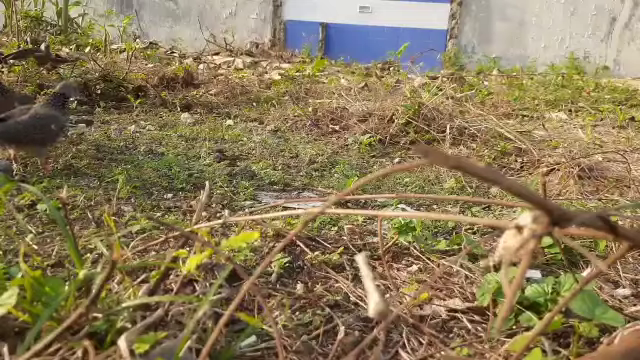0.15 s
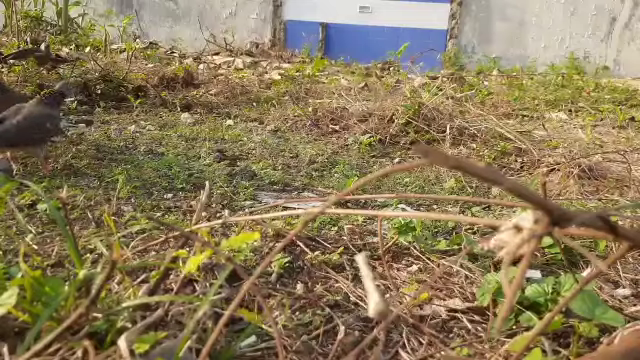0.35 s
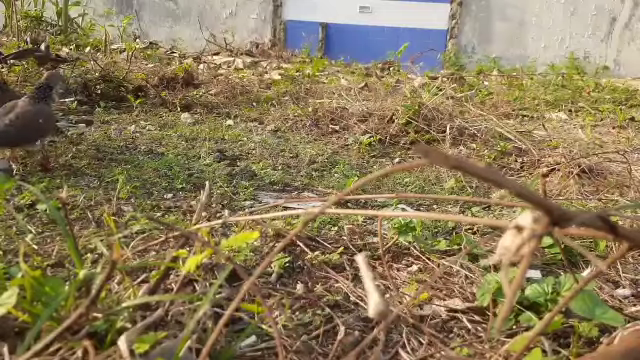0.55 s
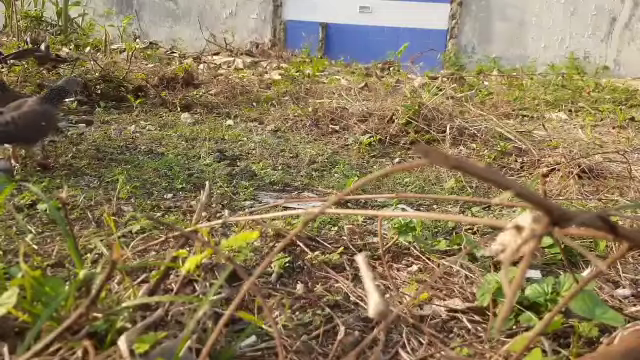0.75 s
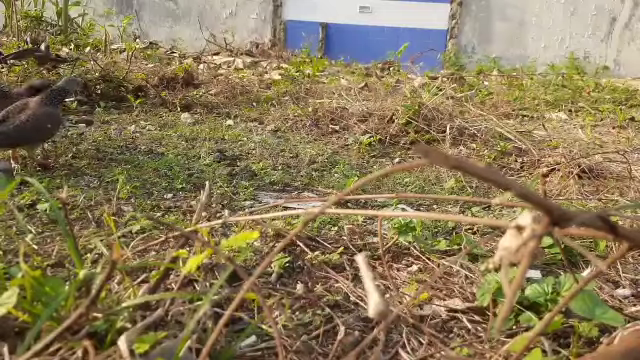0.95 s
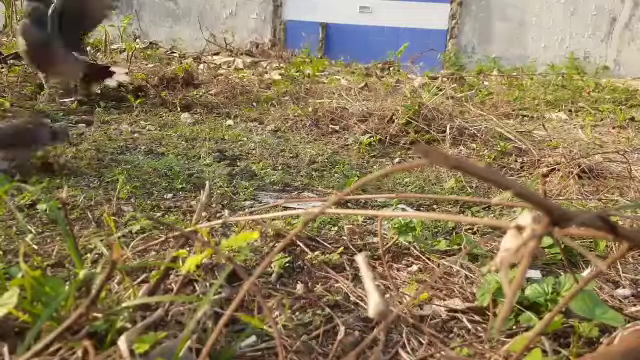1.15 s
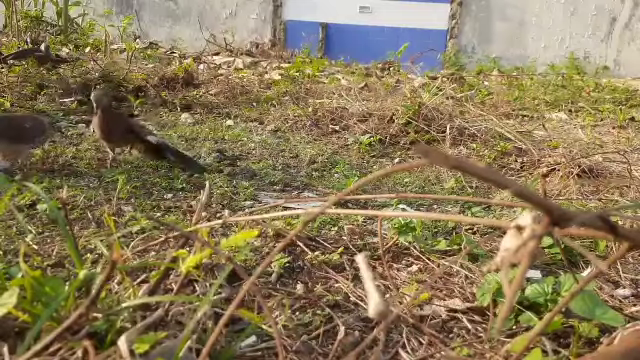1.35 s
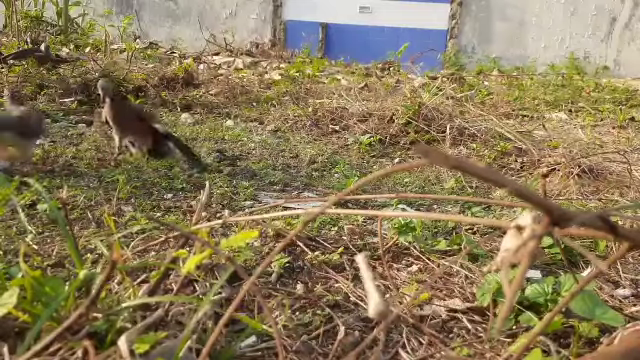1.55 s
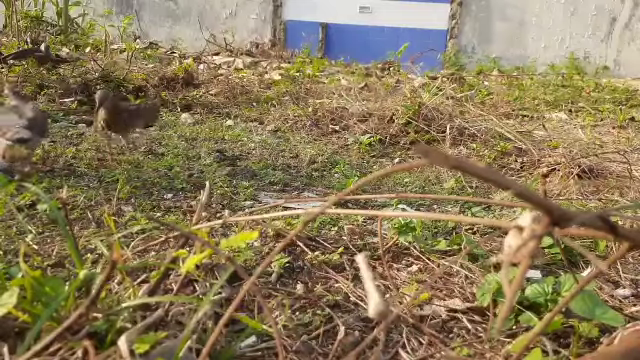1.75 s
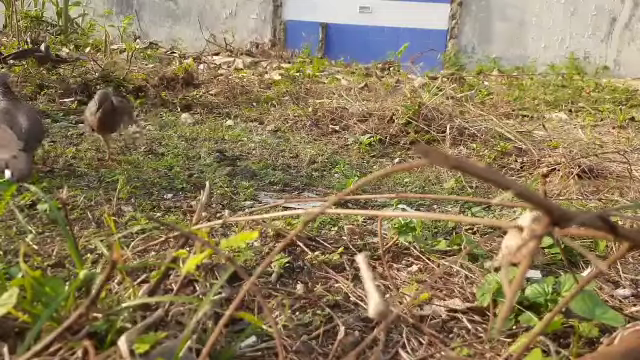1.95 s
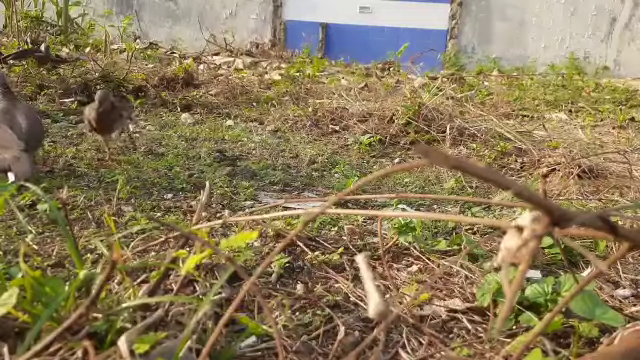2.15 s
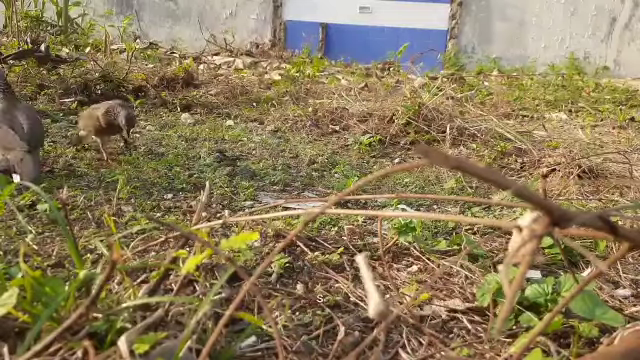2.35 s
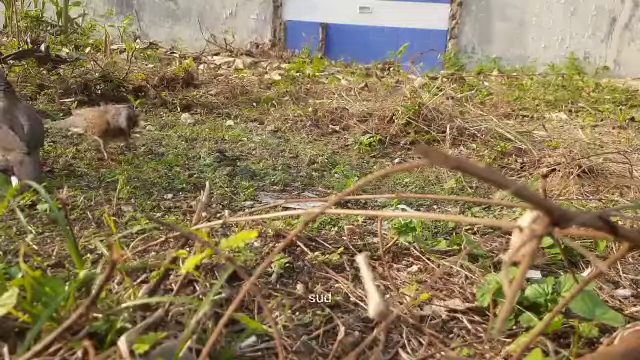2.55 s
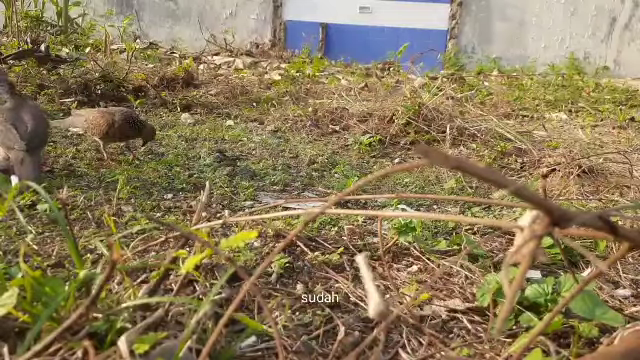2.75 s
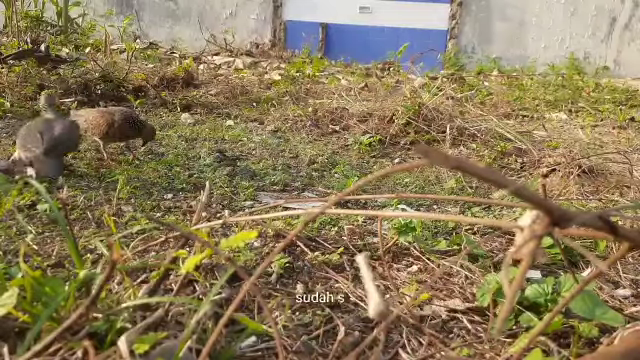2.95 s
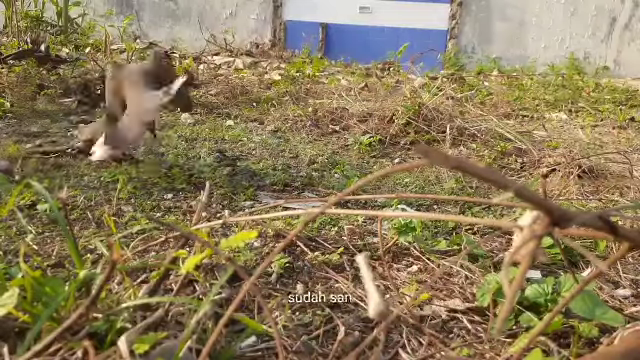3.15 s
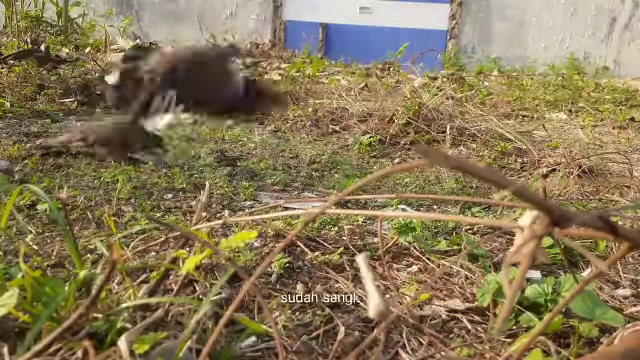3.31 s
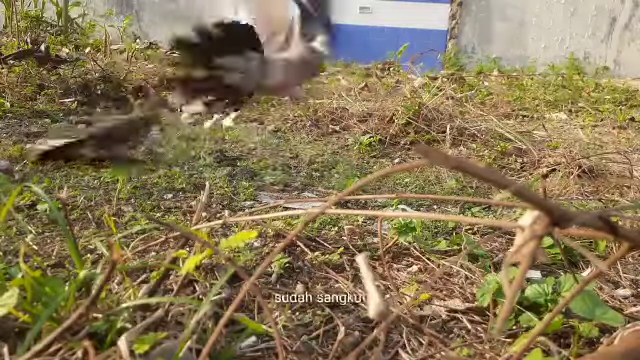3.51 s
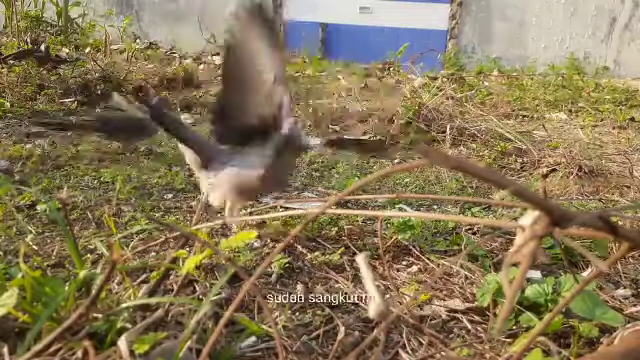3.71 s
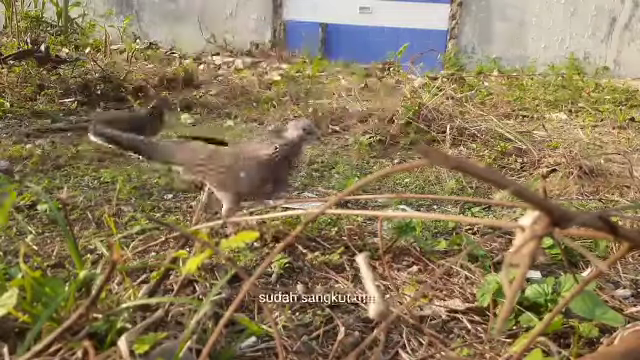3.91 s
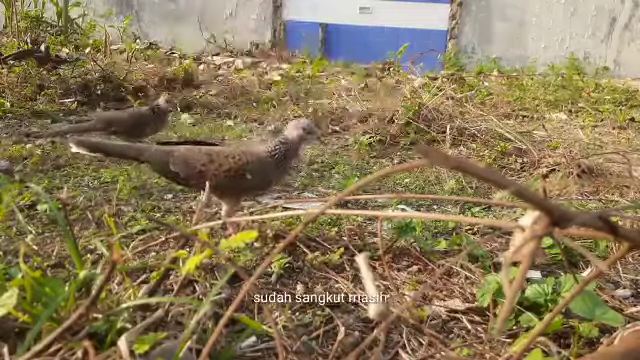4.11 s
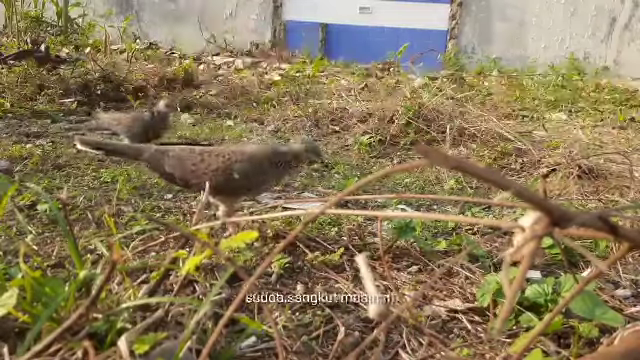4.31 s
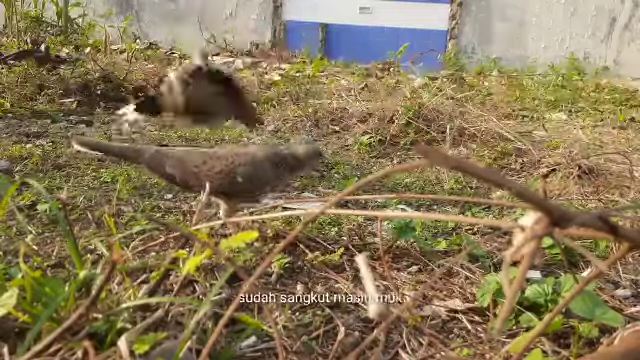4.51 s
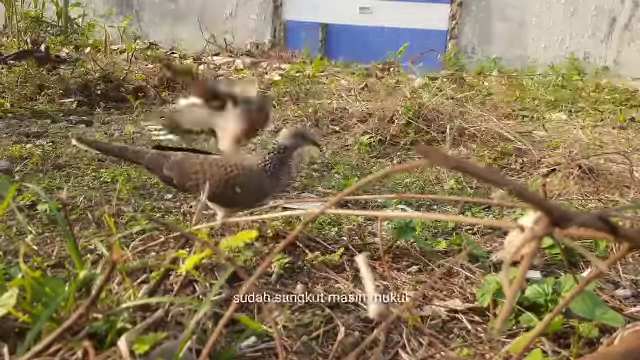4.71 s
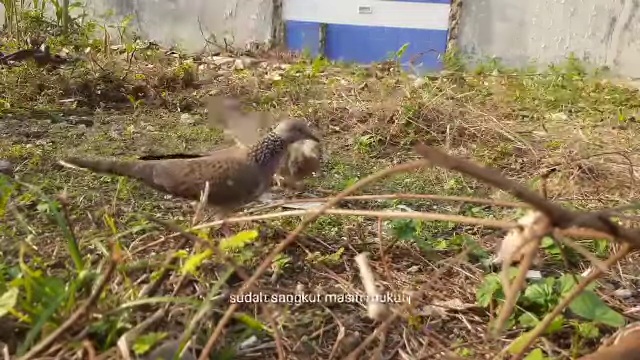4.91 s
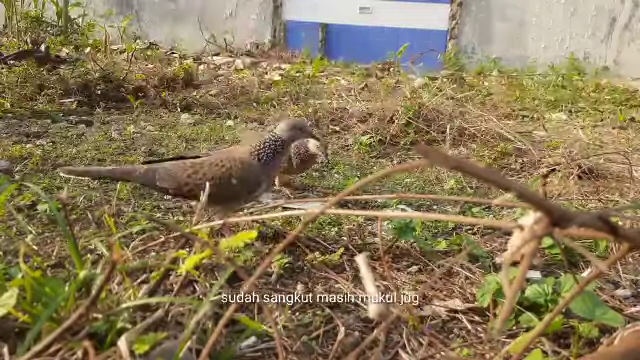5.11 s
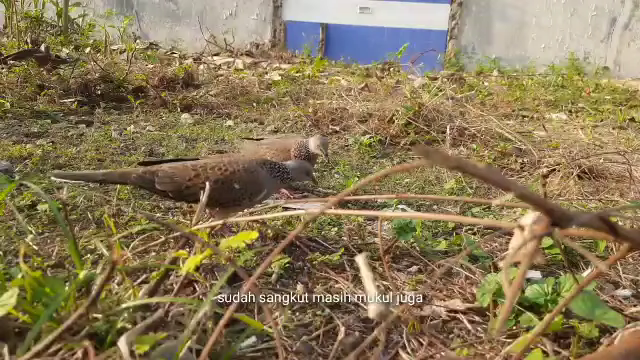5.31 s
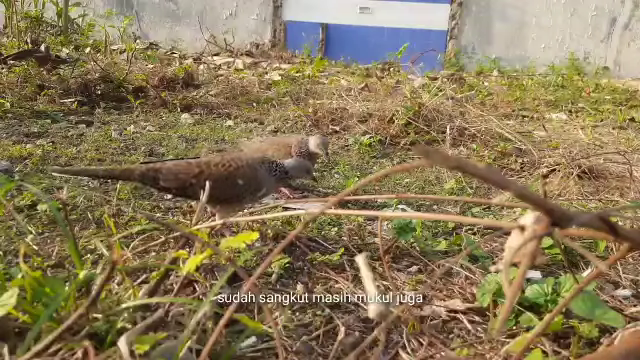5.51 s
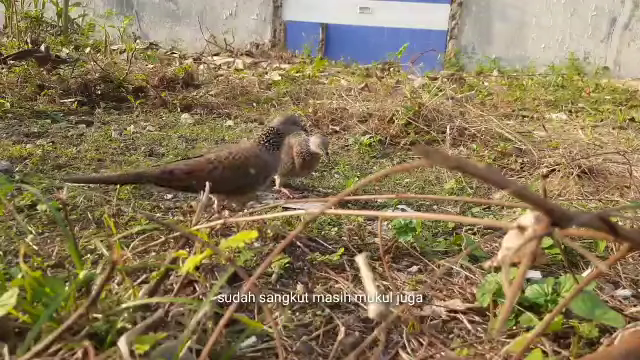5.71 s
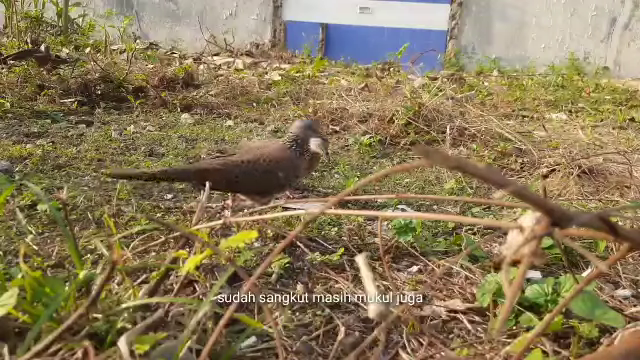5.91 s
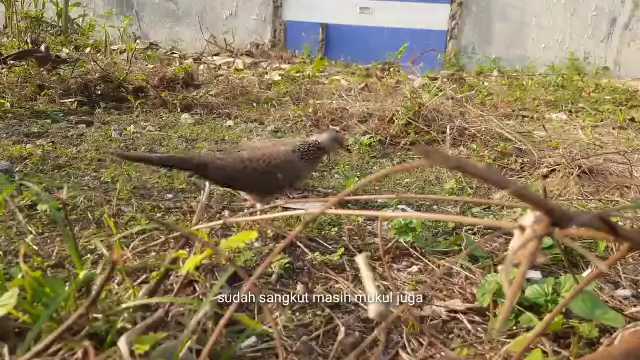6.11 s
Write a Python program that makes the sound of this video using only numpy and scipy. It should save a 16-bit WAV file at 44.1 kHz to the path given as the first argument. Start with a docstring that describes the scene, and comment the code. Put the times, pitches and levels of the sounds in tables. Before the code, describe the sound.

A quiet yard: uneven wind rumble, distant hum, dry stalks crackling under birds' feet on the left. About a second in, nearby wings slap in a very brief flurry. After a pause with little snaps and faint distant whistles, wings clap again, first a quick thump, then a stronger run of whooshing, cracking beats buffeting the microphones. Only small rustles, one faint late flutter and wind remain, with a short, soft outdoor echo.

```python
"""A dove flapping on dry, weedy ground

Near a pair of microphones a dove flaps in short bursts: shaped noise bursts make its feathers crack, short
swings of pressure are the air its wings shove, and swelling noise is the air they tear. Dry stalks rustle
as birds walk: ticking noise. Bright snaps, mostly to the left, are bursts too: stalks under a foot, and one
nearly central snap from the flapping bird. Behind lie rumbling wind and a far hum, both filtered noise, and
far small birds whistle with gliding sines. The yard answers softly."""
import sys
import numpy as np
from scipy import signal
from scipy.fft import rfft, irfft, next_fast_len
from scipy.io import wavfile
from scipy.ndimage import uniform_filter1d, map_coordinates

SR = 44100
rng = np.random.default_rng(int(sys.argv[2]) if len(sys.argv) > 2 else 0)


def wav_out(sig):
    """Save sig, one row per channel (or a flat mono array), as 16-bit PCM at SR to the path in sys.argv[1]."""
    wavfile.write(sys.argv[1], SR, np.round(np.clip(np.atleast_2d(sig).T, -1, 1) * 32767).astype(np.int16))


def attenuation_scalar(level_db):
    """Turn a level in dB into a linear amplitude multiplier (20 dB per decade)."""
    decades = np.asarray(level_db, float) / 20
    return 10 ** decades


N = 271773  # length in samples


def unit(x):
    """Scaled to rms 1."""
    return x / np.sqrt(np.mean(x ** 2) + 1e-20)


def along(points, hz):
    """(Hz, value) points read on a log frequency axis."""
    f, v = np.transpose(points)
    return np.interp(np.log(hz + 1), np.log(f + 1), v)


def curves(rows):
    """One value per sample for each column after the time."""
    s, *columns = np.transpose(rows)
    return [np.interp(np.arange(N) / SR, s, column) for column in columns]


def wobble(rate):
    """A smooth random curve, rate knots a second."""
    knots = rng.standard_normal(int(N * rate / SR) + 4)
    return map_coordinates(knots, [np.arange(N) * rate / SR])


def filtered(x, response):
    """x with its spectrum multiplied by a response of frequency."""
    n = x.shape[-1]
    m = next_fast_len(n + 4096)
    return irfft(rfft(x, m) * response(np.fft.rfftfreq(m, 1 / SR)), m)[..., :n]


def rush(spectrum, alike, source=None):
    """Stereo noise of rms 1, coloured, with the given likeness of the channels."""
    pair = rng.standard_normal((2, N)) if source is None else source

    def mid_side(hz):
        angle = np.arccos(np.clip(along(alike, hz), -1, 1)) / 2
        return attenuation_scalar(along(spectrum, hz)) * [np.cos(angle), np.sin(angle)]

    mid, side = filtered(pair, mid_side)
    return unit(np.array([mid + side, mid - side]))


def patchy(bins, frames, depth_db):
    """Two noises whose gain drifts in shared patches of time and frequency."""
    z = signal.stft(rng.standard_normal((2, N)), nperseg=512)[2]
    field = uniform_filter1d(rng.standard_normal(z.shape[1:]), bins, 0)
    field = uniform_filter1d(field, frames, 1)
    return signal.istft(z * attenuation_scalar(depth_db * unit(field)), nperseg=512)[1][:, :N]


def swells(s, db, rise, fall, hold=0):
    """Gain of overlapping swells: up at rise dB a second, held, down at fall; their powers add."""
    def column(v):
        return np.reshape(v, (-1, 1))

    t = np.arange(0, N + 64, 64) / SR  # one point every 64 samples
    late = t - column(s)
    rising = rise * np.minimum(late, 0)
    falling = column(fall) * np.maximum(late - column(hold), 0)
    power = np.sum(attenuation_scalar(column(db) + rising - falling) ** 2, axis=0)
    return np.interp(np.arange(N) / SR, t, np.sqrt(power))


# How long the ground and yard wall answer. Each row: frequency in Hz, time to fall 60 dB in seconds.
YARD_DECAY = [(200, 0.14), (2000, 0.12), (12000, 0.081)]


def yard(x):
    """Each frequency of the yard's answer, a noise tail, dies at its own speed."""
    hz, t, z = signal.stft(rng.standard_normal((2, SR // 4)), SR, nperseg=128)
    fade = attenuation_scalar(-60 * t / along(YARD_DECAY, hz)[:, None])
    tail = signal.istft(z * fade, SR, nperseg=128)[1]
    late = np.pad(x, ((0, 0), (120, 0)))  # the answer starts 120 samples late
    return signal.fftconvolve(late, tail / np.linalg.norm(tail[0]), axes=1)[:, :N]


# Where the flapping bird stands. Each row: time in seconds, lead of the left microphone in ms.
BIRD_BEARING = [(0, 0.14), (1.5, 0.21), (3.08, 0.15), (3.32, 0.19), (3.39, 0.018), (4, 0.054), (4.5, 0.13),
                (4.96, 0.039)]


def place(out, s, sound, pan_db):
    """Adds a pair from the bird's bearing: the right delayed, the left pan_db louder than the right."""
    when, lead_ms = np.transpose(BIRD_BEARING)
    lag = round(np.interp(s, when, lead_ms) * SR / 1000)
    start = round(s * SR)
    left = np.pad(sound[0], (start, N))[:N] * attenuation_scalar(pan_db / 2)
    right = np.pad(sound[1], (start + lag, N))[:N] * attenuation_scalar(-pan_db / 2)
    return out + [left, right]


# Likeness of diffuse sound at two spaced microphones. Each row: frequency in Hz, correlation from -1 to 1.
DIFFUSE_LIKENESS = [(60, 0.83), (130, 0.95), (290, 0.86), (640, 0.27), (1410, -0.25), (3100, -0.06),
                    (6820, -0.5), (15000, 0.15)]
# Colour of the far hum. Each row: frequency in Hz, relative level in dB per Hz.
FAR_COLOUR = [(400, -13), (800, -4.5), (1300, -0.5), (2000, 0.5), (2600, -2), (3200, -5), (3700, -12.5),
              (6000, -22), (9000, -36)]


def far_hum():
    """A far, murmuring hum: patchy diffuse noise drifting slowly in level."""
    drift = attenuation_scalar(-54.5 + 0.6 * wobble(2.765))
    return drift * rush(FAR_COLOUR, DIFFUSE_LIKENESS, patchy(bins=5, frames=24, depth_db=1.47))


# Far chirps. Each row: start in seconds, length in seconds, level in dB before flicker and the yard's answer.
FAR_CHIRPS = [(0.612, 0.067, -60.5), (0.81, 0.025, -63), (1.84, 0.058, -60), (2.593, 0.045, -63),
              (4.261, 0.036, -66), (6.055, 0.036, -66)]


def chirps():
    """Far small birds: hoarse whistles gliding down and one thin held note, blurred by distance."""
    top_hz, fall_hz_per_s = 5270, 32000
    out = np.zeros((2, N))
    warble_hz = 260 * wobble(300)
    flicker = attenuation_scalar(4 * wobble(200))
    for s, length, db in FAR_CHIRPS:
        u = np.arange(round(length * SR)) / (length * SR)  # 0 to 1 through the chirp
        start = round(s * SR)
        span = slice(start, start + len(u))
        hz = top_hz - fall_hz_per_s * length * u + warble_hz[span]
        tone = np.sin(2 * np.pi * np.cumsum(hz) / SR)
        swell = np.sqrt(np.sin(np.pi * np.sqrt(u)))
        out[:, span] += attenuation_scalar(db) * tone * flicker[span] * swell
    t = np.arange(N) / SR
    note = np.sin(2 * np.pi * np.cumsum(2345 + 25 * wobble(40)) / SR)
    note_gain = attenuation_scalar(-66.5 + 3.5 * wobble(25.1)) * np.exp(-((t - 1.96) / 0.23) ** 4)
    out += note * note_gain
    return out + yard(out)


# Strength of the wind. Each row: time in seconds, rumble and upper rumble in dB before their trims.
WIND_STRENGTH = [(0, -32, -41), (.35, -36, -43), (.9, -36, -42), (1.3, -32.5, -42), (1.7, -35.5, -41),
                 (2.3, -35.5, -40.5), (2.9, -36, -40), (3.6, -30.5, -37.5), (4.35, -35.5, -40.5),
                 (5.1, -34, -42.5), (5.6, -32, -41), (5.85, -33, -37), (6.16, -36, -40)]
# Colours of low and upper wind. Each row: frequency in Hz, relative level in dB per Hz.
LOW_WIND = [(12, -56.5), (20, -38), (27, -30), (53, -5.5), (86, -4), (113, -0.5), (129, -1), (162, -9.5),
            (199, -7), (260, -13), (340, -51), (570, -120)]
UPPER_WIND = [(150, -52), (230, -4.5), (280, -2), (400, -6), (520, -14.5), (700, -21.5), (1000, -33.5),
              (1500, -87)]


def wind():
    """Low turbulence in uneven lumps; the low and upper rumble share their slower swells."""
    rumble_db, upper_db = curves(WIND_STRENGTH)
    lumps = wobble(9)
    rumble = unit(attenuation_scalar(1.2 * lumps + 1.5 * wobble(25)) * rush(LOW_WIND, DIFFUSE_LIKENESS))
    patches = patchy(bins=2, frames=20, depth_db=3.0)
    upper = unit(attenuation_scalar(1.05 * lumps + 1.5 * wobble(30)) * rush(UPPER_WIND, DIFFUSE_LIKENESS, patches))
    return attenuation_scalar(rumble_db + 1.5) * rumble + attenuation_scalar(upper_db - 2.0) * upper


# Dry stalks stirred by feet, tails and downdraught.
# Each row: time in seconds, level in dB before the lean to the left, hold in seconds, fade in dB per second.
STALK_STIRS = [(0, -57.5, .02, 34), (0.613, -61.5, .05, 18), (1.065, -44.5, 0.09, 64), (1.26, -55, .04, 40),
               (1.39, -53.5, .04, 40), (1.55, -59.5, .12, 40), (1.72, -59, .04, 66), (1.87, -63, 0.09, 13),
               (2.217, -57.5, 0.085, 110), (2.582, -57.5, .02, 56), (2.74, -56, 0.018, 107),
               (3.09, -39, 0.014, 302), (3.146, -48.5, 0.3, 40), (3.416, -46.5, 0.32, 110),
               (3.804, -50, .02, 62), (3.995, -56.5, .02, 60), (4.11, -57, 0.018, 150),
               (4.5, -50.5, 0.053, 60), (4.63, -51.5, 0.074, 150), (4.793, -57, .04, 60),
               (4.98, -56, .04, 123), (5.812, -59, 0.018, 84)]
# Colour of the stalks. Each row: frequency in Hz, relative level in dB per Hz.
STALK_COLOUR = [(2000, -14), (4000, -4), (7000, -6.5), (9000, -4), (11500, -3.5), (13500, -6.5),
                (15500, -5)]


def stalks():
    """Dry stalks, mostly to the left: tiny uneven ticks in clumps on a soft hiss."""
    s, db, hold_s, fade = np.transpose(STALK_STIRS)
    still = attenuation_scalar(-65.5)  # the stalks left alone
    gain = np.hypot(still, swells(s, db, 247, fade, hold_s))
    ticking = rng.random(N) < 900 / SR  # about 900 ticks a second
    ticks = ticking * attenuation_scalar(3.5 * rng.exponential(size=N) + 4.5 * wobble(40))
    grain = unit(ticks * rng.standard_normal((2, N)))
    mix = 0.55 * grain + patchy(bins=30, frames=3, depth_db=2.5)
    return gain * rush(STALK_COLOUR, [(1000, 0.028)], mix) * attenuation_scalar([[1.5], [-1.5]])


def crackle(hz, ms, bright_db, dull_db):
    """Stiff things meet: a spiky bright burst of one broad colour over a duller slap."""
    t = np.arange(SR // 20) / SR
    burst, apart, thud = rng.standard_normal((3, len(t)))
    spikes = attenuation_scalar(1.2 * rng.standard_normal(len(t) // 8 + 1).repeat(8)[:len(t)])
    spread = filtered(apart, lambda f: f / (f + 9000)) * [[1.1], [-1.1]]  # each side gets its own treble

    def colour(f):
        peak = 0.5 + 0.34 / (1 + ((f - hz) / 1200) ** 2)
        return peak / (1 + (2700 / (f + 1)) ** 4) / (1 + (f / 13000) ** 4)

    def dull(f):
        return 1 / (1 + (750 / (f + 1)) ** 4) / (1 + (f / 2600) ** 4)

    bright = attenuation_scalar(bright_db) * unit(filtered(spikes * (burst + spread), colour))
    slap = attenuation_scalar(dull_db) * unit(filtered(thud, dull))
    held = np.exp(-(t * 1000 / ms) ** 2) + 0.14 * np.exp(-t / 0.0088)  # contact, then settling
    onset = 1 - np.exp(-t * 1000 / (0.25 * ms))  # long contacts begin softly
    return held * onset * (bright + slap)


# Bright snaps, mostly to the left: stalks under a foot, and one nearly central snap from the flapping bird.
# Each row: start in seconds, level in dB before a lift, contact in ms, left over right in dB.
BRIGHT_SNAPS = [(.115, -59, 5.3, 14), (1.389, -46, 14, 1), (1.722, -57, 4.9, 9), (1.868, -55, 10, 15),
                (2.076, -52, 1.9, 8), (2.219, -56, 4.4, 15), (2.504, -56, 2.8, 16), (2.722, -60, 7, 15),
                (3.03, -56, 3.5, 14), (4, -53.5, 2.6, 14), (4.058, -54, 1.8, 14), (4.117, -62, 8.2, 8),
                (4.555, -56, 4, 5), (4.62, -54, 3, 5), (5.357, -57, 2.4, 14)]


def snaps():
    """Stalks under a foot, mostly to the left, and one nearly central snap of the bird: bursts over slaps."""
    out = np.zeros((2, N))
    for s, db, ms, pan_db in BRIGHT_SNAPS:
        out = place(out, s, crackle(11000, ms, db + 3.5, db - 1.5 + 4.5), pan_db)
    return out


# Wing strokes. Each row: time of full speed in seconds, swish in dB, buffet in dB.
WING_STROKES = [(1.076, -33.5, -22.5), (1.125, -41, -34), (1.166, -39, -26), (1.23, -39.5, -44),
                (3.084, -48, -22), (3.122, -39, -27.5), (3.349, -33, -20), (3.418, -24, -17),
                (3.486, -20, -15), (3.545, -18.5, -10.5), (3.628, -25, -13.5), (3.72, -36.5, -34.5),
                (4.55, -47, -39)]
# Colours of torn air and of buffeting. Each row: frequency in Hz, relative level in dB per Hz.
TORN_AIR = [(300, 6), (600, 1), (1500, -8), (2800, -9), (4500, -17.5), (10000, -23), (15500, -25)]
BUFFETING = [(30, -44), (60, 6), (100, 4), (200, -12.5), (380, -5), (550, -7.5), (800, -20), (1200, -60)]


def swish():
    """Wing strokes tear the air into fluttering noise and buffet the microphones."""
    s, swish_db, buffet_db = np.transpose(WING_STROKES)
    near = [(200, 0.99), (1400, 0.86), (6000, 0.17), (15000, 0.076)]  # Hz, left-right likeness
    torn = unit(attenuation_scalar(2.5 * wobble(150) + 2.5 * wobble(50)) * rush(TORN_AIR, near))
    buffet = unit(attenuation_scalar(2 * wobble(60)) * rush(BUFFETING, near))
    return swells(s, swish_db, 314, 253) * torn + swells(s, buffet_db, 414, 680) * buffet


# Lumps of air shoved by a wing.
# Each row: centre in seconds, peak in dB before panning and the loss of deep bass, swing in Hz.
AIR_SHOVES = [(1.0609, -13, 225), (1.061, -12.5, 970), (1.0703, -9.5, 306), (1.108, -20.5, 657),
              (1.1142, -17, 270), (1.1214, -19.5, 236), (1.1456, -4, 673), (1.1501, -6, 125),
              (1.1708, -20.5, 295), (1.187, -20.5, 150), (1.222, -32.5, 810), (3.079, -19, 320),
              (3.0854, -11, 293), (3.0913, -9.5, 320), (3.3959, -8, 146), (3.403, -14.5, 74),
              (3.469, -9.5, 181), (3.4827, -13, 340), (3.5446, -11.5, 172), (3.5512, -12, 119),
              (3.5572, -7.5, 217), (3.5793, -11.5, 196), (3.6035, -12, 430), (3.619, -9, 187),
              (3.631, -25, 342), (4.965, -32, 280)]


def shoves():
    """Each stroke sucks then pushes the air: a swelling and fading swing with steep flanks, unsteady in pitch."""
    half_length_ms = 2.18
    out = np.zeros((2, N))
    t = np.arange(-SR // 50, SR // 50) / SR
    for s, db, hz in AIR_SHOVES:
        bend = uniform_filter1d(rng.standard_normal(len(t)), 60) * 2
        steep = np.tanh(2.36 * np.sin(2 * np.pi * hz * t + bend))
        swing = np.exp(-(t * 1000 / half_length_ms) ** 2) * steep
        lump = attenuation_scalar(db) * swing / np.abs(swing).max()
        out = place(out, s + t[0], [lump, lump], 0.54)
    return filtered(out, lambda f: 1 / (1 + (48 / (f + 1)) ** 4))  # a small wing radiates no deep bass


# Wing feathers cracking together.
# Each row: start in seconds, crack in dB before a lift, colour in Hz, contact in ms, slap in dB before a lift.
FEATHER_CRACKS = [(1.0595, -17.5, 3300, 5.1, -19.5), (1.0675, -26.5, 3500, 4.7, -23.5),
                  (1.0825, -30, 3400, 2.3, -28), (1.108, -32.5, 6500, 2.8, -30),
                  (1.1454, -13, 4800, 2.3, -15), (1.147, -17.5, 10100, 2.7, -12),
                  (1.17, -33, 3400, 1.9, -28), (1.22, -53, 5000, 7.2, -44), (1.2388, -35, 4500, 3.5, -40),
                  (3.0637, -37, 4600, 7, -44), (3.0821, -26.5, 11300, 6.1, -24),
                  (3.0907, -24, 3600, 2.2, -21), (3.1976, -38, 12200, 7.1, -41.5),
                  (3.317, -31.5, 4600, 1.5, -31.5), (3.324, -37, 11400, 2.1, -42),
                  (3.353, -35, 5300, 13, -35), (3.3928, -13, 4500, 2.05, -17),
                  (3.452, -31, 12100, 2.6, -32), (3.4652, -10, 5130, 0.83, -15.5),
                  (3.541, -28, 3800, 3.1, -26), (3.546, -25, 9000, 2.2, -17.5),
                  (3.553, -28, 3400, 5.4, -19.5), (3.5752, -15.5, 3430, 2.3, -20),
                  (3.6012, -33, 5800, 6.4, -22), (3.6203, -25, 3380, 3.8, -22),
                  (3.657, -37, 3400, 3.3, -35.5), (3.748, -42, 11800, 6.4, -46.5),
                  (3.956, -39.5, 11800, 1.2, -55), (4.521, -40.5, 14000, 3.1, -43),
                  (4.958, -42.5, 11000, 13, -44)]


def cracks():
    """Stiff wing feathers meet: a bright crack and a duller slap from the bird's bearing."""
    out = np.zeros((2, N))
    for s, db, hz, ms, slap_db in FEATHER_CRACKS:
        out = place(out, s, crackle(hz, ms, db + 3.5, slap_db + 4.5), 1.2)
    return out


def scene():
    """Wings near, stalks around, wind and far sounds behind; the yard answers the hits."""
    background = (far_hum() + wind()) * attenuation_scalar([[0.35], [-0.35]])
    hits = snaps() + shoves() + cracks()
    return background + chirps() + stalks() + swish() + hits + attenuation_scalar(-19.0) * yard(hits)


# Colour of the microphones' hiss. Each row: frequency in Hz, relative level in dB per Hz.
MICROPHONE_HISS = [(1500, -14), (3700, 0), (6000, -4), (7200, -2), (8500, -5), (11000, -5), (15500, -9)]


def low_pass(x):
    """Removes everything above the highest recorded frequency."""
    return signal.sosfilt(signal.butter(12, 16470, fs=SR, output="sos"), x)


def record(dry):
    """The microphones add a steady hiss, the left hears more of the top octave; peaks clip at full scale."""
    hiss = attenuation_scalar(-63.5) * rush(MICROPHONE_HISS, [(1000, 0)])

    def response(hz):
        lean = attenuation_scalar(np.outer([1, -1], 3.0 * (hz / 15000) ** 3))
        return lean / (1 + (hz / 15500) ** 260)  # steep upper edge at 15.5 kHz

    band = filtered(dry + hiss, response)
    return low_pass(np.clip(band, -1, 1))


dry = scene()
out = record(dry)
wav_out(out)
```